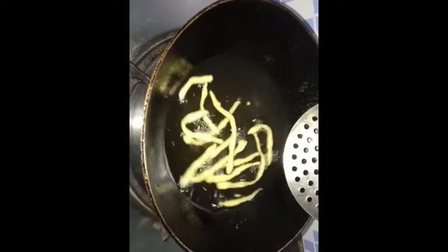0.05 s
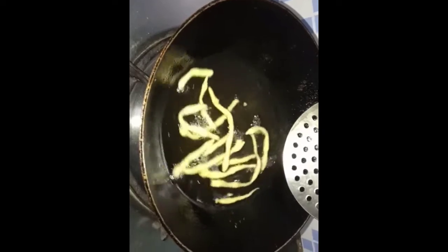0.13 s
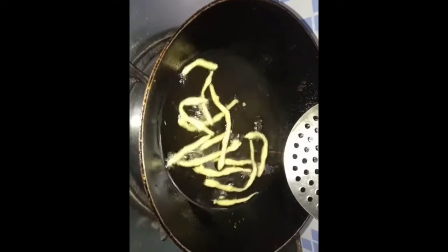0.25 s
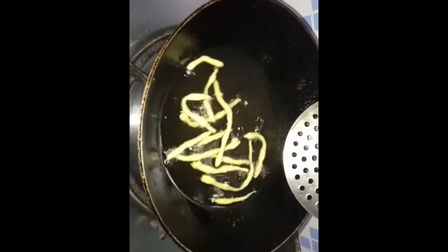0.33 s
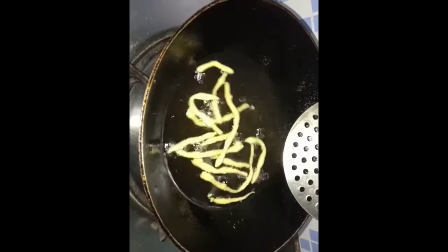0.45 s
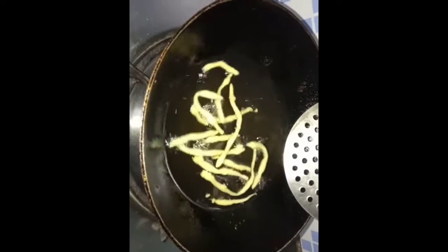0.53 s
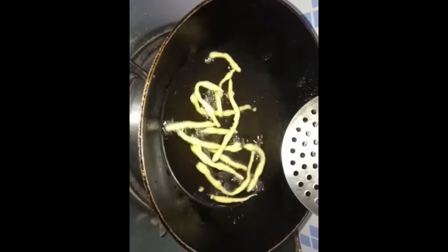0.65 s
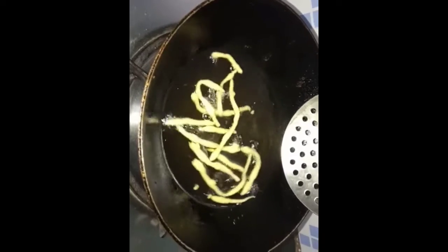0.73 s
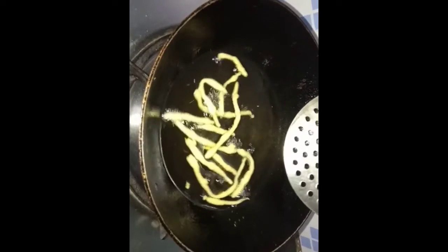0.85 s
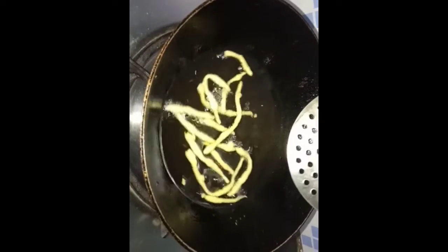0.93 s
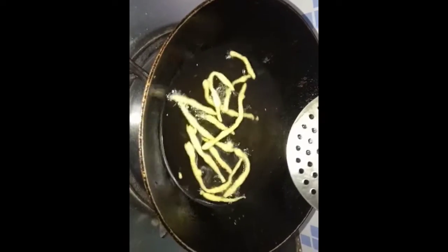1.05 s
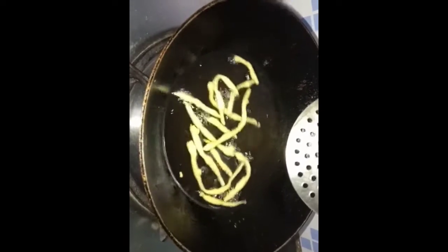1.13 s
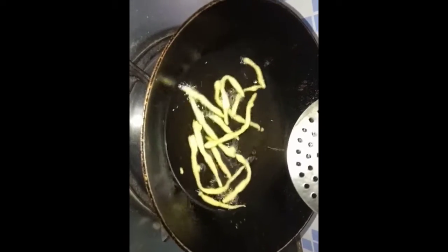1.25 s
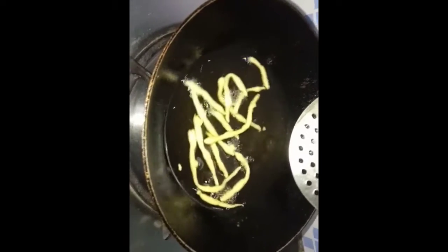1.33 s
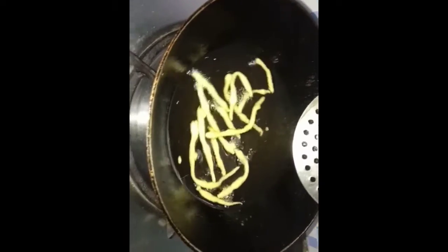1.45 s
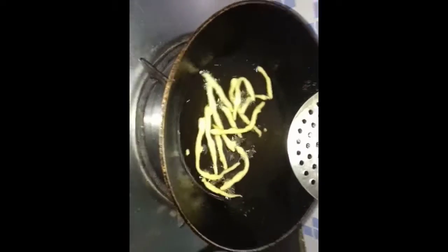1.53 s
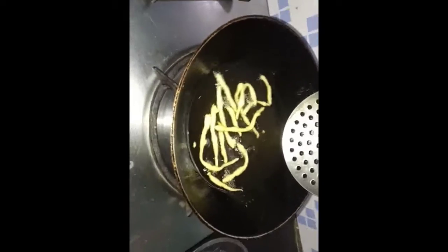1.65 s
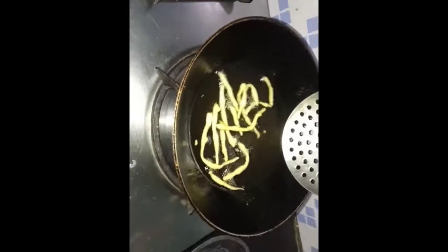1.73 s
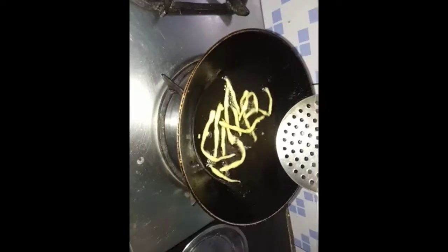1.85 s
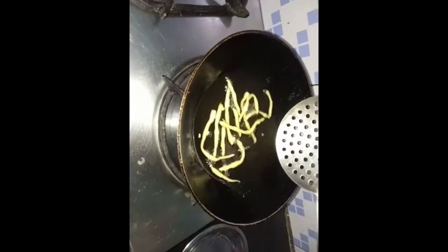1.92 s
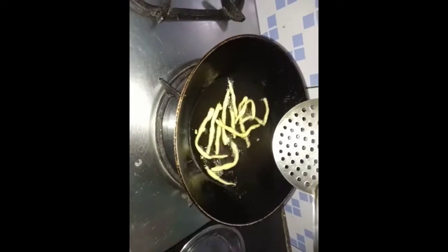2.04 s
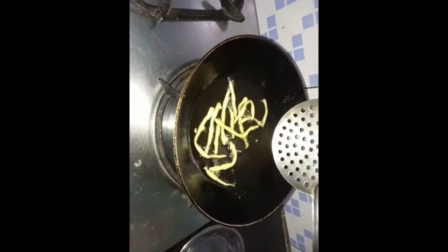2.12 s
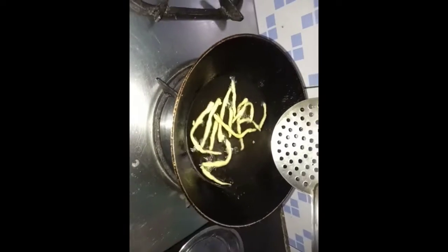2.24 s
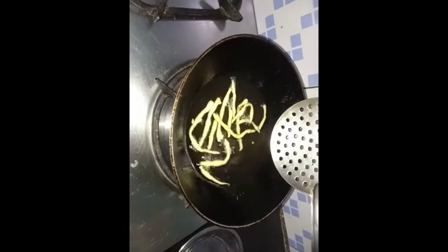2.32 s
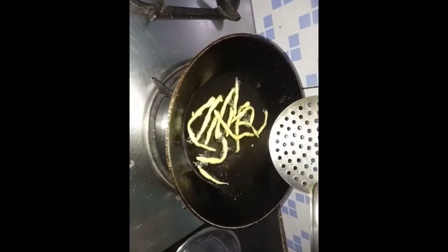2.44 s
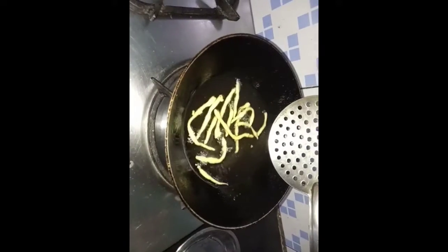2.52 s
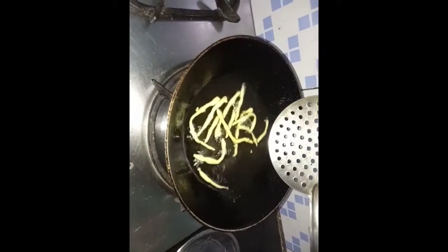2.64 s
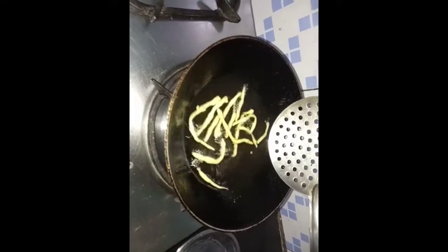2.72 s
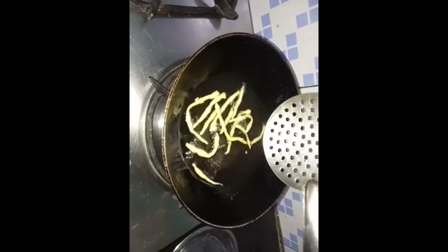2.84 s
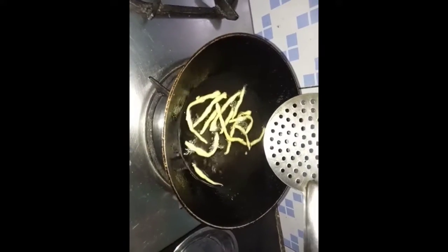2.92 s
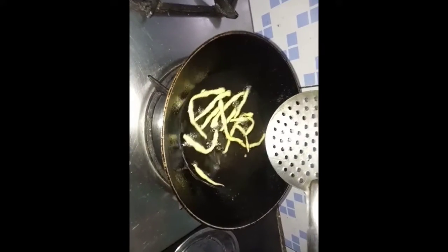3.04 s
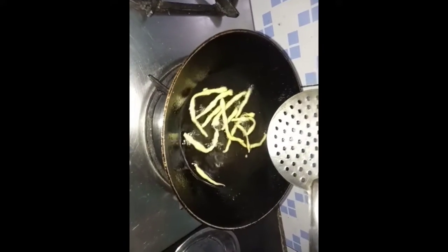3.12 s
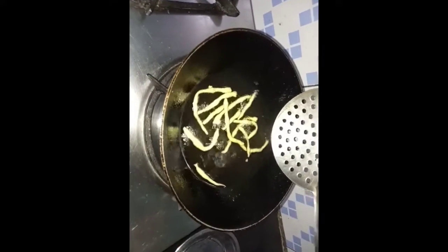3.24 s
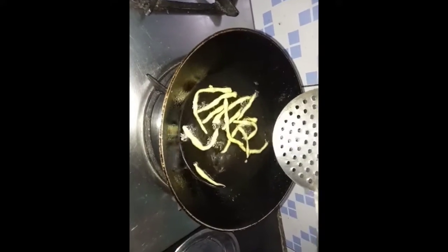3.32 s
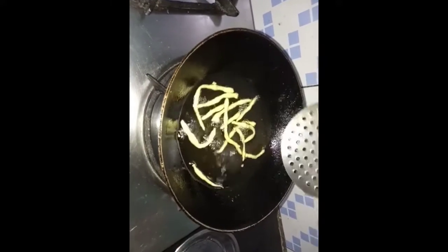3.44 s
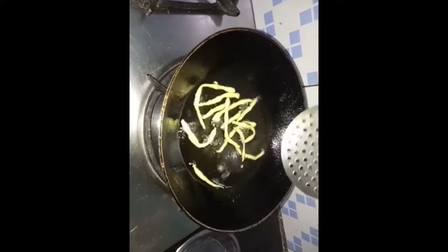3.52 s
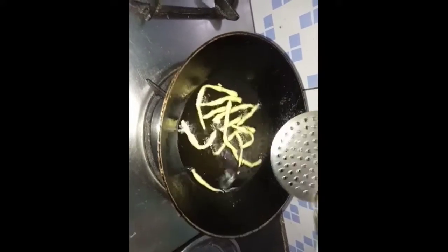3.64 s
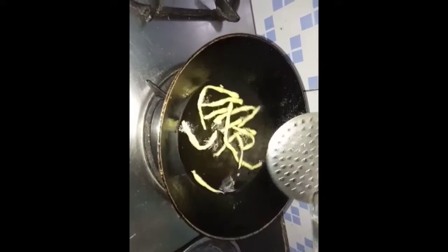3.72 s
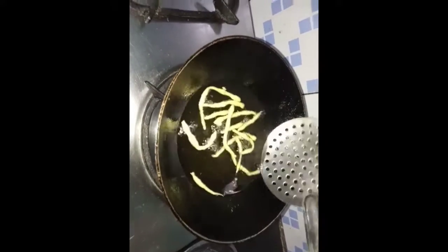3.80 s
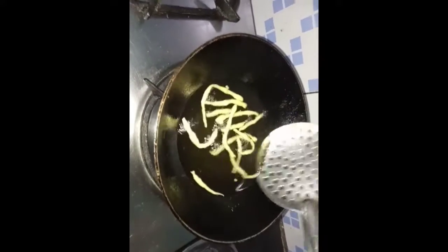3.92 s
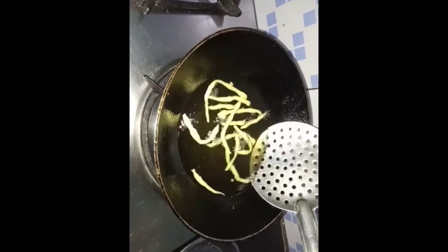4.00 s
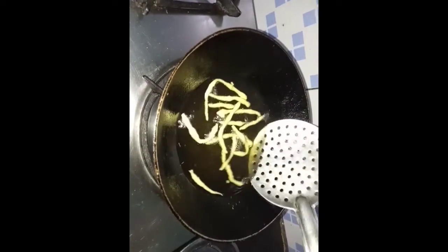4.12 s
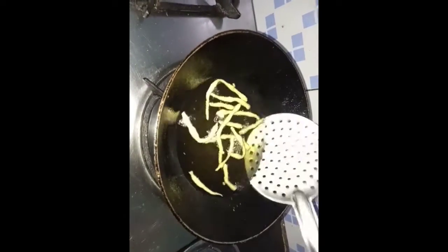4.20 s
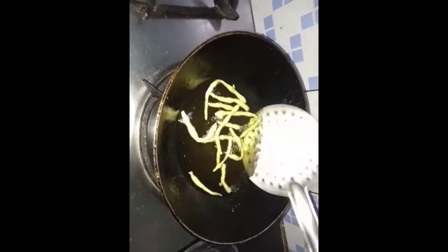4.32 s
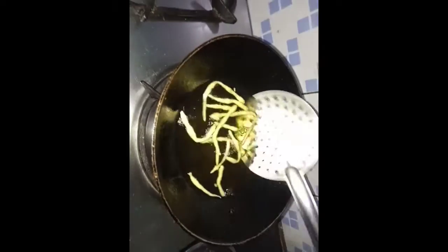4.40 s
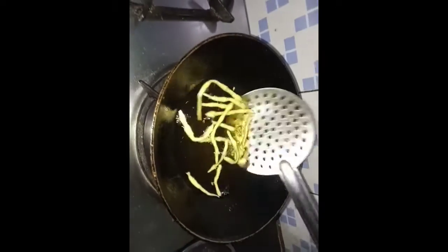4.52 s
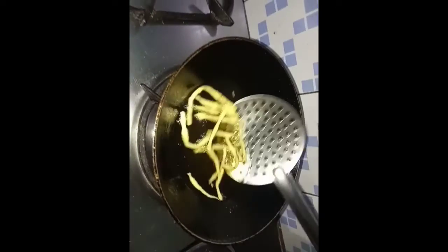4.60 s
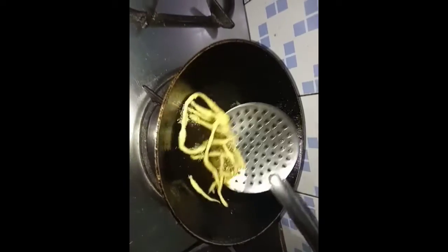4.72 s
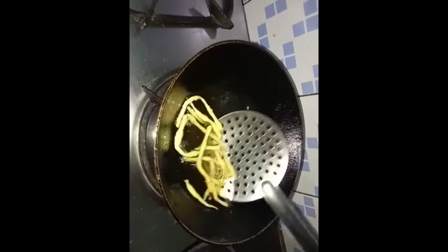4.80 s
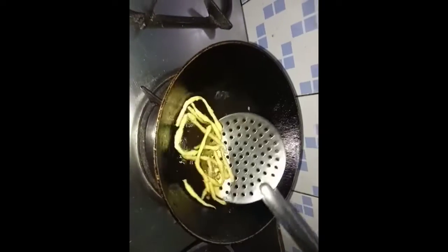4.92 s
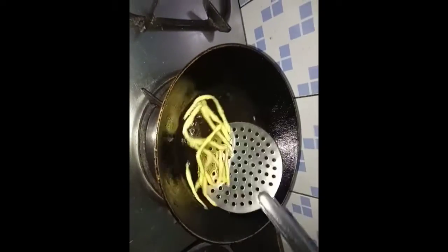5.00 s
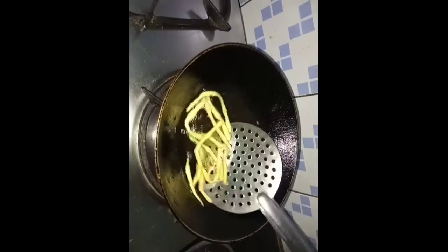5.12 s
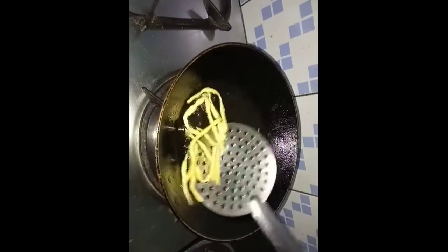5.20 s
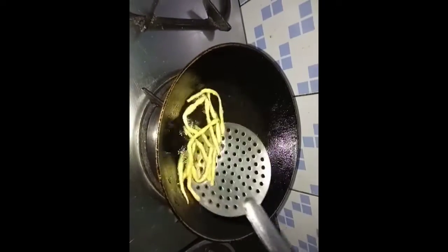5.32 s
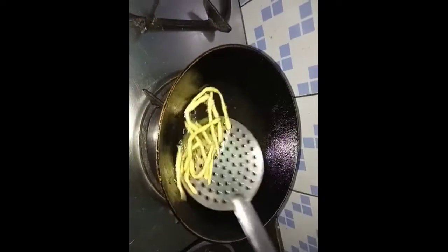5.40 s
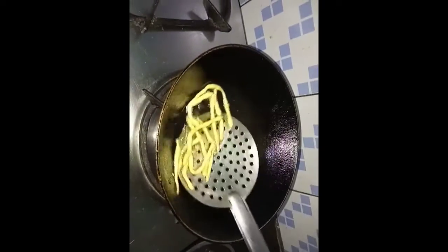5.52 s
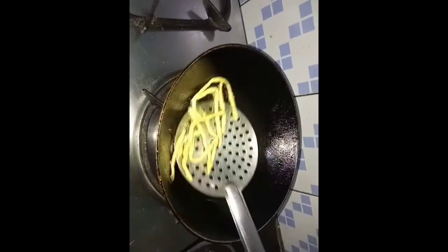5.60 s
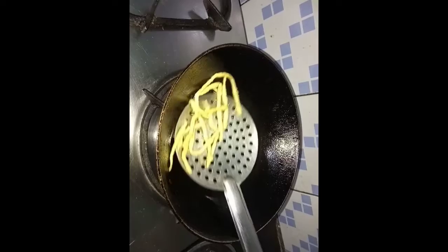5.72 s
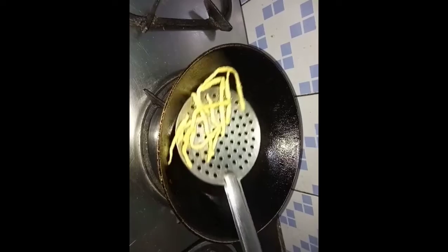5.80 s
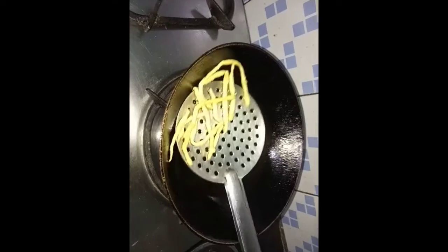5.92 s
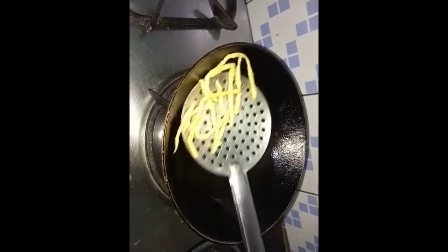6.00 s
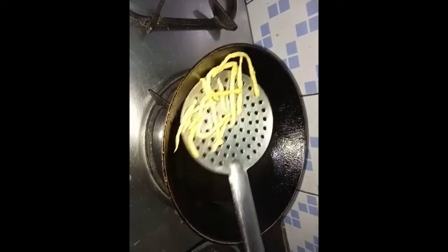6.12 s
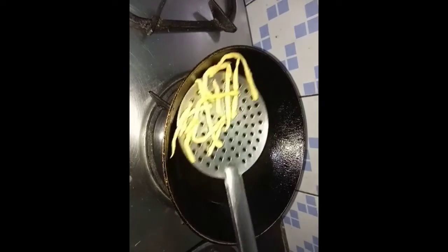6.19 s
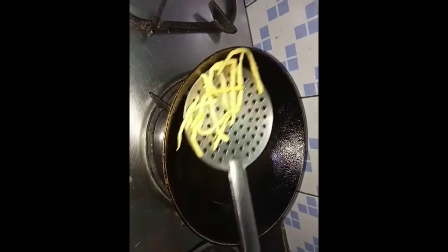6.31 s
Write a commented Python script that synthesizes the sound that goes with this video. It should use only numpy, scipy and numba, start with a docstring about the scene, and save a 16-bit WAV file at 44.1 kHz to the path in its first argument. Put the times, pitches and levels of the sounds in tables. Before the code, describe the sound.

Close above a stove in a small tiled kitchen, hot oil sizzles densely from the start, a bright crackle of countless bubbles with sharp pitched spits several times a second. A faint burner rush lies underneath. Soft low thumps of the wok shifting come just after 0 and near 0.9 seconds; otherwise the frying runs steadily until 3.65, when a steel skimmer knocks the rim with a dull clack and brief low ring. Light bumps and groaning slides follow, with another touch at 3.96 as it dips in and the burble thickens. At 4.62 comes the loudest hit, a hard bright clank with a thud, then a smaller double knock around 4.85. Scrapes and dull thuds continue to about 5.7, gritty near 5.3 and 5.5. From 5.8 the sizzle falls away quickly, leaving thin hollow hisses, sparse crackle and a soft low bump at 6.25. The echo is short.

```python
"""Small tiled kitchen: batter strands fry in a wok of hot oil, over a faint steady burner rush.
Random decaying bubbles and ticks make the dense sizzle; pitched ticks with fizz make the single bursts.
A perforated steel skimmer knocks the rim, dips in, clanks on the bottom and scrapes under the strands:
noise and impulses through steel modes, and moving resonances for the groans.
The sizzle thins as the strands are lifted out, hissing thinly."""
import sys
import numpy as np
from scipy import signal
from scipy.fft import rfft, irfft, next_fast_len
from scipy.io import wavfile
from scipy.ndimage import uniform_filter1d, map_coordinates
from numba import njit

SR = 44100
rng = np.random.default_rng(int(sys.argv[2]) if len(sys.argv) > 2 else 0)


def persist_wave(psi):
    """Save psi, clipped to +-1, as 16-bit WAV."""
    counts = np.round(np.clip(psi, -1, 1) * 32767).astype(np.int16)
    wavfile.write(sys.argv[1], SR, np.atleast_2d(counts).T)


N = 280035

# Strength of the boil. Each row: time in seconds, big bubbles in dB, small bubbles in dB, both before trim.
BOIL_DB = [(0.0, -54, -54.5), (0.4, -53.5, -52.5), (1.1, -54.5, -52.5), (1.3, -54, -51.5), (1.66, -54, -53),
           (2.4, -54, -53.5), (3.77, -52.5, -53), (4.44, -56, -51), (4.79, -52.5, -51), (4.99, -54, -52.5),
           (5.17, -54.5, -54), (5.4, -54, -53), (5.78, -57, -53.5), (5.88, -61, -58.5), (6.05, -64, -59),
           (6.18, -66, -58.5), (6.35, -74, -59.5)]
BIG_TRIM_DB, SMALL_TRIM_DB = 1, -0.5
# Filter colour of the sizzle above the bowl. Each row: frequency in Hz, gain in dB.
SIZZLE_COLOUR = [(300, -24), (780, -12.5), (865, -4), (930, -14), (1130, -8.5), (1420, -11.5), (1620, -2),
                 (2200, -2.5), (3000, -2), (3600, -4), (5000, 0.5), (6600, 2), (7900, -6), (10000, -7),
                 (12000, -11), (15800, -17)]
# Treble above about 8 kHz. Each row: time in seconds, gain in dB.
SHEEN_DB = [(0, 0.5), (1.3, -2), (2.3, 2.5), (4.3, -1), (5.15, -2), (6.35, 0.5)]

# Faint burner and kitchen rush. Each row: frequency in Hz, gain in dB.
BURNER_COLOUR = [(20, -4), (60, -3), (130, -2.5), (400, -3.5), (900, -16.5), (4000, -8.5), (16000, -42)]

# Single bursts at set times. Each row: start in seconds, nominal peak in dB, pitch in Hz.
TIMED_SPITS = [(0.116, -31, 3830), (0.3072, -33, 3440), (0.5578, -34.5, 3160), (0.728, -33, 6650),
               (0.8783, -33, 3600), (1.208, -40, 2850), (1.2676, -30, 5700), (1.314, -34, 3350),
               (1.349, -37.5, 3100), (1.492, -32, 3800), (1.776, -39, 3080), (1.838, -34, 5930),
               (2.04, -33, 3700), (2.1557, -33.5, 5030), (2.2942, -36, 6200), (2.4438, -34, 4180),
               (2.687, -34, 5010), (3.06, -34, 5000), (3.549, -34, 5860)]
# Further bursts come by chance, with nominal peaks set over the boil.
SPITS_PER_S, SPIT_OVER_BOIL_DB, SPIT_LOW_HZ, SPIT_HIGH_HZ = 6, 18.5, 3470, 6700
# Tick and steam fizz, both against a burst's nominal peak.
TICK_DB = -3
FIZZ_DB, FIZZ_RISE_S, FIZZ_T60_S, FIZZ_WIDTH_HZ = -6.5, 0.005, 0.05, 1030

# Fat bubbles: level against the boil, gain that fades in over the second around DIP_S, pitch;
# the skimmer enters the oil at DIP_S.
WELLING_DB, DIP_GAIN_DB, WELLING_HZ, DIP_S = -12.5, 4, 1111, 4.0

# Soft shifts of the wok on its support.
# Each row: start in seconds, length in seconds, level in dB, pitch in Hz, glide in Hz per second.
NUDGES = [(.03, .008, -49, 345, -1100), (.052, .008, -55, 315, 0), (.075, .06, -68, 325, -150),
          (.168, .075, -67, 316, -80), (.866, .014, -62, 290, -500), (.893, .02, -53.5, 295, 1000),
          (.94, .09, -66, 345, -450)]
NUDGE_ATTACK_S, NUDGE_T60_S = 0.0059, 0.074
NUDGE_WAVER = .05  # relative pitch

# Sharp skimmer contacts. Each row: start in seconds, level in dB, crack t60 in seconds,
# hardness (lowpass) in Hz, nominal ring against crack in dB.
CLANKS = [(3.6533, -33, 0.048, 3000, -23), (3.672, -40, 0.11, 3800, -28), (3.961, -39.5, 0.18, 4020, -21),
          (4.621, -21.5, 0.022, 14000, -13), (4.6235, -34, 0.095, 12000, -22),
          (4.63, -29, 0.097, 9000, -12), (4.638, -43, .07, 7500, -19), (4.851, -40, 0.27, 9900, -13),
          (4.859, -35.5, 0.049, 11100, -18), (5.157, -47, .024, 15000, -20), (5.416, -52, .03, 15000, -18)]
# Skimmer modes. Each row: pitch in Hz, level struck in dB, t60 in seconds, level scraped in dB.
SKIMMER_MODES = [(2186, -11, .19, -12), (2788, -9, .25, -8), (2975, -6, .1, -2), (3367, -8, .14, -9),
                 (3539, 2.5, .1, -8), (4744, -4, .12, -7), (5382, 0, .12, -7), (5835, 1, .08, -6),
                 (6150, -5, .15, -3), (6376, -1, .12, -3), (6600, 0, .1, -5), (6740, 1, .13, -4),
                 (7360, -7, .15, 0), (7600, -7, .14, -7), (8730, -10, .14, -1), (10210, -11, .15, -.5),
                 (11790, -21, .4, -15), (12970, -19, .15, -17), (13480, -18.5, .45, -14),
                 (14100, -19, .12, -17), (15290, -23, .12, -19)]
# Filter colour of steel meeting steel. Each row: frequency in Hz, gain in dB.
CRACK_COLOUR = [(100, -20), (300, 2.5), (700, -11), (1200, -10.5), (2900, -6), (3500, -1.5), (4500, -3.5),
                (6700, 0.5), (8000, -8), (10500, -13.5), (15800, -13.5)]
# Edge grating on steel. Each row: loudest moment in seconds, half width in seconds, level in dB.
SCRAPES = [(4.72, 0.078, -53.5), (4.835, 0.019, -52.5), (5.292, 0.042, -47), (5.495, .031, -51)]
STUTTERS_PER_S, STUTTER_DB = 70, 1.5  # stick and slip

# Blows and bounces on the wok. Each row: start in seconds, nominal thud in dB, chatter t60 in seconds,
# hardness (upper band edge) in Hz, hum in dB.
KNOCKS = [(3.657, -27, 0.03, 666, -63), (3.669, -33, 0.071, 900, -70), (3.681, -39, 0.12, 800, -70),
          (3.786, -40.5, .1, 500, -44), (3.807, -39.5, 0.069, 500, -55), (3.965, -51, .097, 450, -43),
          (4.222, -54, .05, 450, -53), (4.28, -46, 0.099, 886, -52), (4.369, -49, .05, 600, -62),
          (4.623, -30, 0.091, 1100, -55), (4.634, -32, 0.11, 1000, -65), (4.655, -36.5, 0.072, 900, -70),
          (4.677, -33, .08, 1490, -75), (4.848, -38, 0.038, 453, -64), (4.87, -35.5, 0.043, 454, -56),
          (4.887, -42.5, 0.046, 450, -65), (4.92, -41, .04, 405, -45), (5.168, -48, .06, 503, -58),
          (5.324, -43, .1, 704, -47), (5.497, -36, 0.2, 397, -42.5), (5.699, -54.5, 0.058, 400, -62),
          (6.239, -42.5, .25, 256, -53), (6.264, -45, .12, 330, -44)]
CHATTER_DB = -24.5  # support rattle against the blow
# Rim touches that ring the free wok. Each row: start in seconds, level in dB.
RIM_TOUCHES = [(3.657, -30), (3.964, -46.5)]
# Clear wok modes. Each row: pitch in Hz, level in dB, t60 in seconds.
WOK_MODES = [(360, -5, 1.0), (813, -16.5, .7), (1405, -24, .3)]
# Dull wok resonances on the burner ring. Each row: centre in Hz, width in Hz, level in dB.
THUD_RESONANCES = [(128, 26, -12), (163, 32, -5), (208, 28, -5.5), (271, 33, 0.5), (311.8, 16, 2),
                   (359.3, 12, -1), (425, 30, -12), (544, 40, -12), (610, 60, -19), (689, 40, -9)]
# Wok humming on its support. Each row: pitch in Hz, level in dB, t60 in seconds.
HUM_MODES = [(280, -7, 0.091), (314.6, 0, 0.29), (337, -19, 0.39)]

# Pushes of the skimmer along the wok. Each row: start in seconds, length in seconds, level in dB,
# groan pitch in Hz, groan glide in Hz per second, upper resonance in Hz, its gain on the push level in dB.
STROKES = [(3.70, .14, -48, 320, -150, 693, -17.5), (3.96, 0.11, -53, 306, -130, 640, -12.5),
           (4.09, .08, -63, 342, -3, 690, -22), (4.27, .15, -51, 354, -250, 625, -13),
           (4.45, 0.26, -53.5, 312, -170, 600, -32), (4.62, 0.074, -53.5, 302, -130, 700, 6),
           (4.73, 0.095, -56.5, 324, 0, 610, -9.5), (4.93, .21, -56, 342, -40, 683, -10),
           (5.18, 0.14, -53.5, 310, -450, 680, -12), (5.33, 0.047, -50, 309, -400, 690, -22),
           (5.39, 0.11, -51.5, 222, 100, 570, -11.5), (5.5, 0.066, -51, 292, -100, 580, -17),
           (5.62, 0.21, -62, 292, 0, 535, -17), (5.86, 0.072, -53.5, 285, -450, 600, -35),
           (5.96, 0.082, -56, 230, -350, 690, -27), (6.26, 0.097, -51.5, 285, -130, 520, -18)]
PUSH_ATTACK_S, PUSH_T60_S = 0.02, 0.15
# Rocking: pitch, gain when the groan is at GROAN_HZ, growth as the groan sinks.
ROCK_HZ, ROCK_DB, ROCK_DB_PER_HZ, GROAN_HZ = 148, -20, 0.0786, 301

# Hisses of the lifted strands.
# Each row: start in seconds, length in seconds, level in dB, pitch in Hz, glide in Hz per second.
DRAIN_HISSES = [(5.98, .35, -73, 5050, 0), (6.18, 0.082, -65.5, 2530, 900), (6.28, .06, -68.5, 2470, -1200)]
DRAIN_WAVER = .012  # relative pitch

# Kitchen echo. Each row: frequency in Hz, t60 in seconds.
KITCHEN_T60 = [(200, 0.36), (2000, 0.067), (14000, 0.018)]
TOP_HZ = 15750


def amp(db):
    """Decibels to gain."""
    return 10 ** (np.asarray(db) / 20)


def unit(x):
    """x at rms 1."""
    return x / np.sqrt(np.mean(x ** 2) + 1e-20)


def along(points, hz):
    """(Hz, value) points read on a log axis."""
    point_hz, value = np.transpose(points)
    return np.interp(np.log(hz + 1), np.log(point_hz + 1), value)


def curves(rows):
    """One value per sample for each column after the time."""
    s, *columns = np.transpose(rows)
    return [np.interp(np.arange(N) / SR, s, column) for column in columns]


def wobble(knots_per_s):
    """A smooth random curve."""
    knots = knots_per_s * N / SR
    coarse = map_coordinates(rng.standard_normal(int(knots) + 4), [np.linspace(0, knots, N // 64)])
    return np.interp(np.arange(N), np.linspace(0, N, len(coarse)), coarse)


def add(track, s, sound):
    """Mix a sound into the track from time s."""
    part = track[max(round(s * SR), 0):][:len(sound)]
    part += sound[:len(part)]


def held(s, length_s, attack_s, t60_s):
    """An envelope that rises from time s, holds to s + length_s, then dies away."""
    t = np.arange(N) / SR - s
    return np.clip(t / attack_s, 0, 1) * amp(-60 * np.maximum(t - length_s, 0) / t60_s)


def filtered(x, response):
    """x times a response of frequency."""
    m = next_fast_len(len(x) + SR // 2)
    return irfft(rfft(x, m) * response(np.fft.rfftfreq(m, 1 / SR)), m)[:len(x)]


def coloured(x, points, size=4096):
    """x through a causal minimum-phase filter with the given (Hz, dB) colour."""
    cepstrum = irfft(np.log(amp(along(points, np.fft.rfftfreq(size, 1 / SR)))))
    cepstrum[1:size // 2] *= 2
    cepstrum[size // 2 + 1:] = 0
    return signal.fftconvolve(x, irfft(np.exp(rfft(cepstrum))))[:len(x)]


@njit
def resonate(x, hz, width_hz, sr):
    """x through one resonance whose centre moves."""
    y = np.zeros(len(x))
    r = np.exp(-np.pi * width_hz / sr)
    for i in range(2, len(x)):
        y[i] = x[i] - x[i - 2] + 2 * r * np.cos(2 * np.pi * hz[i] / sr) * y[i - 1] - r * r * y[i - 2]
    return y


def throaty(x, hz, width_hz):
    """x twice through a moving resonance, for steep skirts, rms 1."""
    once = resonate(x, hz, float(width_hz), SR)
    return unit(resonate(once, hz, float(width_hz), SR))


def ring(modes, scatter_db):
    """One second of free ringing from rest, every mode at a random strength."""
    t, out = np.arange(SR) / SR, np.zeros(SR)
    for hz, db, t60_s, *_ in modes:
        strength_db = db + scatter_db * rng.standard_normal()
        out += amp(strength_db - 60 * t / t60_s) * np.sin(2 * np.pi * hz * t)
    return out


def sizes(count, spread_db):
    """Many small grains and a few big ones, of random sign."""
    return amp(spread_db * np.minimum(rng.standard_normal(count), 2.6)) * rng.choice([-1, 1], count)


def ticks(per_s, spread_db):
    """Sharp ticks at random moments, rms 1."""
    count = int(per_s * N / SR)
    return unit(np.bincount(rng.integers(0, N, count), sizes(count, spread_db), N))


def bubbles(per_s, low_hz, high_hz, cycles, rise, spread_db, size=160):
    """Bursting bubbles that swell over rise cycles and ring for a few more, rms 1."""
    count = int(per_s * N / SR)
    when, pitch, life = rng.random((count, 3)).T
    hz = low_hz + (high_hz - low_hz) * pitch
    turns = hz[:, None] * np.arange(size) / SR
    decay = np.exp(-turns / (cycles * (.5 + life[:, None])))
    swell = 1 - np.exp(-turns / rise)
    pops = decay * swell * np.cos(2 * np.pi * turns)
    pops *= (sizes(count, spread_db) * np.sqrt(hz))[:, None]
    pops *= np.cos(np.linspace(0, np.pi / 2, size))  # fade to zero
    at = (when * N).astype(int)[:, None] + np.arange(size)
    return unit(np.bincount(at.ravel(), pops.ravel(), N)[:N])


def sizzle():
    """Steam leaves the batter in flurries of big and small bubbles, over a crackle of bursting oil films."""
    big_db, small_db = curves(BOIL_DB)
    sheen_db, = curves(SHEEN_DB)
    flurry = wobble(40)
    big = bubbles(per_s=3000, low_hz=1405, high_hz=4550, cycles=2.4, rise=3.4, spread_db=6.0, size=220)
    small = bubbles(per_s=2400, low_hz=4550, high_hz=10680, cycles=2.9, rise=0.71, spread_db=6.0)
    big = unit(coloured(big, SIZZLE_COLOUR))
    small = unit(coloured(small, SIZZLE_COLOUR))
    crackle = unit(coloured(ticks(per_s=7000, spread_db=3), SIZZLE_COLOUR))
    # thick films on the big bubbles give the crackle its lower half
    dull = filtered(crackle, lambda hz: 1 / (1 + (hz / 4400) ** 10))
    # a few thin films snap more brightly
    films = ticks(per_s=140, spread_db=2.5)
    snaps = unit(coloured(films, [(1500, -29), (5000, -3), (10000, -4.5), (15800, -13)]))  # Hz, dB
    low = amp(-3.0) * big + amp(2.0) * dull
    low *= amp(big_db + BIG_TRIM_DB + 0.67 * flurry + 1.06 * wobble(30))
    high = amp(-1.0) * small + amp(-1.2) * (crackle - dull) + amp(-14.0) * snaps
    high *= amp(small_db + SMALL_TRIM_DB + 0.83 * flurry + 0.4 * wobble(30))
    treble = filtered(high, lambda hz: 1 - 1 / (1 + (hz / 8000) ** 10))
    return low + high + (amp(sheen_db) - 1) * treble


def burner():
    """The faint steady rush of the gas flame: coloured noise."""
    return amp(-73.0) * unit(coloured(rng.standard_normal(N), BURNER_COLOUR))


def welling():
    """Fat bubbles burble at a wavering pitch, follow the boil and grow gradually around the skimmer's dip."""
    boil_db, _ = curves(BOIL_DB)
    fade_in = np.clip(np.arange(N) / SR - DIP_S + .5, 0, 1)
    waver = 1 + .035 * wobble(14)
    burble = throaty(ticks(per_s=1200, spread_db=5.0), WELLING_HZ * waver, width_hz=290)
    return burble * amp(boil_db + WELLING_DB + DIP_GAIN_DB * fade_in + 3.25 * wobble(14))


def nudges():
    """Each small shift of the wok gives a soft, unsteady hum that glides and wavers in pitch."""
    t, out = np.arange(N) / SR, np.zeros(N)
    waver = 1 + NUDGE_WAVER * wobble(60)
    for s, length_s, db, hz, glide in NUDGES:
        pitch_hz = waver * (hz + glide * np.clip(t - s, 0, length_s + NUDGE_T60_S / 4))
        hum = np.sin(2 * np.pi * np.cumsum(pitch_hz) / SR)
        out += amp(db) * held(s, length_s, NUDGE_ATTACK_S, NUDGE_T60_S) * hum
    unsteady = amp(2 * wobble(70))
    return out * unsteady


def spits():
    """Single bubbles burst with a pitched tick and a brief steam fizz; the boil sets the chance peaks."""
    out, t = np.zeros(N), np.arange(SR // 10) / SR
    boil_db, _ = curves(BOIL_DB)
    chance = []
    for u, v in rng.random((int(SPITS_PER_S * N / SR), 2)):
        peak_db = boil_db[int(u * N)] + SPIT_OVER_BOIL_DB
        chance.append((u * N / SR, peak_db, SPIT_LOW_HZ + v * (SPIT_HIGH_HZ - SPIT_LOW_HZ)))
    fizz_envelope = (1 - np.exp(-t / FIZZ_RISE_S)) * amp(FIZZ_DB - 60 * t / FIZZ_T60_S)
    for s, db, hz in list(TIMED_SPITS) + chance:
        age = hz * t / 2  # the tick peaks after two cycles
        tick = amp(TICK_DB) * np.sin(2 * np.pi * hz * t) * (age * np.exp(1 - age)) ** 2
        fizz = throaty(rng.standard_normal(len(t)), np.full(len(t), float(hz)), FIZZ_WIDTH_HZ)
        add(out, s, amp(db) * (tick + fizz * fizz_envelope))
    return out


def skimmer():
    """The skimmer clanks on the steel; its scraping edge catches in tiny slips that ring its modes."""
    out, t = np.zeros(N), np.arange(SR) / SR
    for s, db, t60_s, hard_hz, ring_db in CLANKS:
        crack = unit(coloured(rng.standard_normal(SR), CRACK_COLOUR)) * amp(-60 * t / t60_s)
        clank = crack + amp(ring_db - 5) * ring(SKIMMER_MODES, scatter_db=-3)
        # a glancing touch is duller than a square hit
        lowpass = signal.butter(2, min(hard_hz, TOP_HZ), fs=SR)
        add(out, s, amp(db) * signal.lfilter(*lowpass, clank))
    scrape = sum(amp(db) / np.cosh((np.arange(N) / SR - s) / width_s) for s, width_s, db in SCRAPES)
    # the edge sticks and slips unevenly
    slips = ticks(per_s=1800, spread_db=3.5) * amp(STUTTER_DB * wobble(STUTTERS_PER_S))
    singing = np.zeros(N)
    for hz, _, _, scraped_db in SKIMMER_MODES:
        # pressure damps the mode; it wavers as the point of contact wanders
        strength = amp(scraped_db + 3 * wobble(30))
        singing += strength * resonate(slips, hz * (1 + .003 * wobble(25)), 70., SR)
    grit = unit(signal.lfilter([1, -.7], 1, coloured(slips, CRACK_COLOUR)))
    grating = amp(-3) * unit(singing) + amp(-4.5) * grit
    return out + scrape * grating


def thudding(x):
    """x through the damped resonances of the wok on its burner, alternating in sign."""
    def response(f):
        total = 0
        for k, (hz, width_hz, db) in enumerate(THUD_RESONANCES):
            damping = 1j * f * width_hz
            total = total + (-1) ** k * amp(db) * damping / (hz * hz - f * f + damping)
        return total
    return filtered(x, response)


def wok():
    """Knocks thud through damped resonances and raise a hum; rim touches ring the clear modes."""
    out, t = np.zeros(N), np.arange(SR) / SR
    onset = 1 - np.exp(-t / 0.0039)
    for s, thud_db, t60_s, hard_hz, hum_db in KNOCKS:
        # one push, then chatter on the support
        force = rng.standard_normal(SR) * amp(CHATTER_DB - 60 * t / t60_s)
        force[0] += 1
        # a soft contact shakes only the low resonances
        band = signal.butter(2, [122, max(hard_hz, 200)], "bandpass", fs=SR)
        thud = thudding(signal.lfilter(*band, force))
        hum = amp(hum_db) * onset * ring(HUM_MODES, scatter_db=4.5)
        add(out, s, amp(thud_db - 1.5) * thud / np.abs(thud).max() + hum)
    for s, db in RIM_TOUCHES:
        add(out, s, amp(db) * onset * ring(WOK_MODES, scatter_db=-1.0))
    return out


def sliding():
    """Each push makes the wok rumble, rock and groan, with an upper resonance set by where it presses."""
    t = np.arange(N) / SR
    push, upper, groan_hz = np.zeros(N), np.zeros(N), np.full(N, float(STROKES[0][3]))
    slips = ticks(per_s=520, spread_db=1.5)
    for s, length_s, db, start_hz, glide, upper_hz, upper_db in STROKES:
        level = amp(db) * held(s, length_s, PUSH_ATTACK_S, PUSH_T60_S)
        push += level
        upper += amp(upper_db) * level * throaty(slips, np.full(N, float(upper_hz)), width_hz=124)
        groan_hz = np.where(t < s, groan_hz, start_hz + glide * np.minimum(t - s, length_s))
    groan_hz = uniform_filter1d(groan_hz, size=SR // 25)  # slides from push to push
    groan = throaty(ticks(per_s=500, spread_db=5.0), groan_hz, width_hz=99)
    rumble = unit(thudding(ticks(per_s=270, spread_db=3.5)))
    rocking = throaty(ticks(per_s=710, spread_db=3), np.full(N, float(ROCK_HZ)), width_hz=110)
    rocking *= amp(ROCK_DB + ROCK_DB_PER_HZ * (GROAN_HZ - groan_hz))
    judder = amp(1.8 * wobble(35))
    return judder * (push * (amp(-5.0) * groan + amp(-17.0) * rumble + rocking) + upper)


def draining():
    """Out of the oil, the strands give thin, hollow hisses: noise in a gliding, wavering resonance."""
    t, out = np.arange(N) / SR, np.zeros(N)
    for s, length_s, db, hz, glide in DRAIN_HISSES:
        pitch_hz = (hz + glide * np.clip(t - s, 0, length_s)) * (1 + DRAIN_WAVER * wobble(25))
        hiss = throaty(rng.standard_normal(N), pitch_hz, width_hz=260)
        out += amp(db) * held(s, length_s, attack_s=0.024, t60_s=0.2) * hiss
    return out


def kitchen(x, count=24):
    """The tiled walls answer with a short noise tail, redrawn for each piece; the treble dies first."""
    out, start = np.zeros(N), 0
    for piece in np.array_split(x, count):
        hz, t, z = signal.stft(rng.standard_normal(SR // 2), SR, nperseg=256)
        decay = amp(-60 * t / along(KITCHEN_T60, hz)[:, None])
        tail = signal.istft(z * decay, SR, nperseg=256)[1]
        add(out, start / SR, signal.fftconvolve(piece, tail / np.linalg.norm(tail)))
        start += len(piece)
    return out


def scene():
    """Oil and steel, heard from just above the stove, with echo and burner."""
    oil = sizzle() + welling() + spits() + draining()
    steel = nudges() + skimmer() + wok() + sliding()
    echo = kitchen(amp(-10.0) * oil + amp(-13.5) * steel)
    return (amp(-0.86) * oil + steel + echo + burner())[None]


def record(dry):
    """The microphone keeps nothing above its band limit."""
    return filtered(dry[0], lambda hz: hz < TOP_HZ)[None]


dry = scene()
out = record(dry)
persist_wave(out)
```